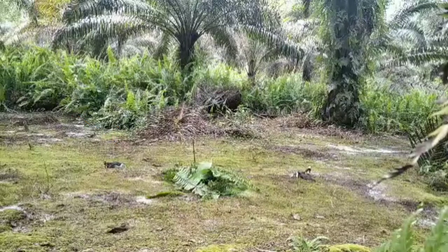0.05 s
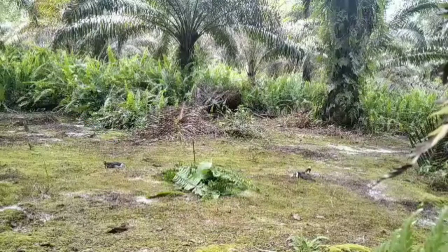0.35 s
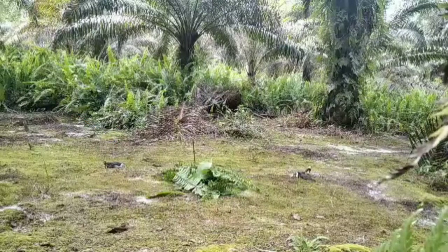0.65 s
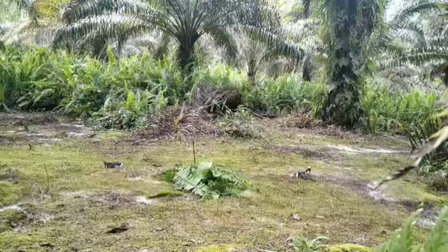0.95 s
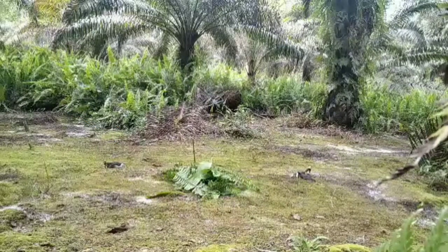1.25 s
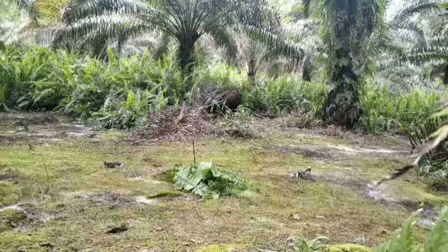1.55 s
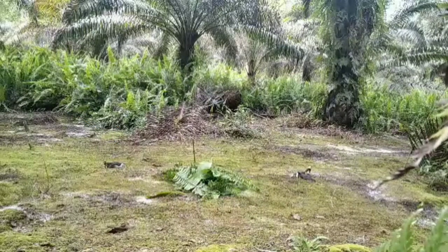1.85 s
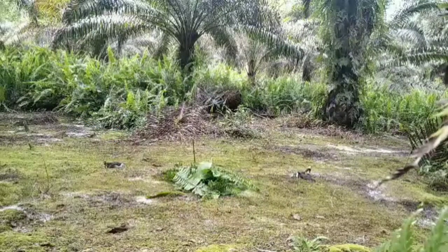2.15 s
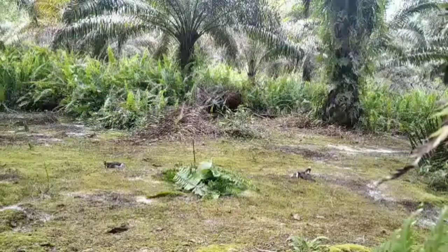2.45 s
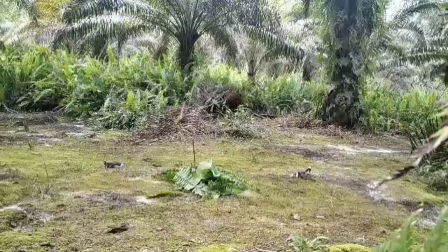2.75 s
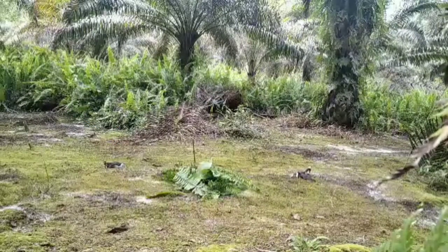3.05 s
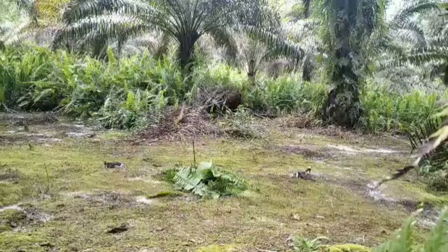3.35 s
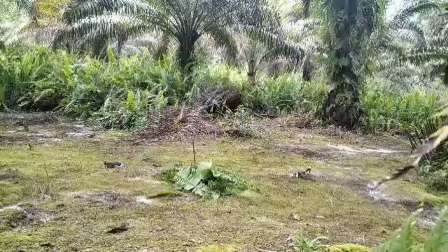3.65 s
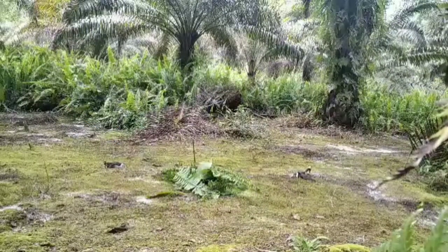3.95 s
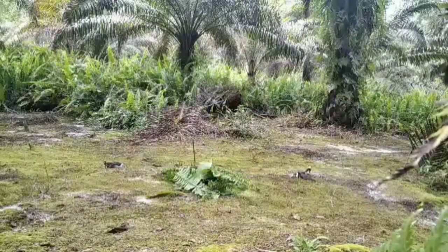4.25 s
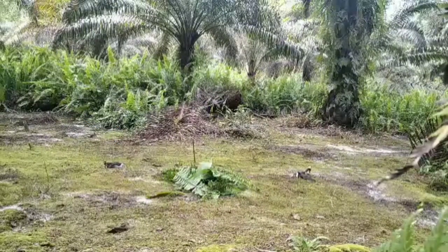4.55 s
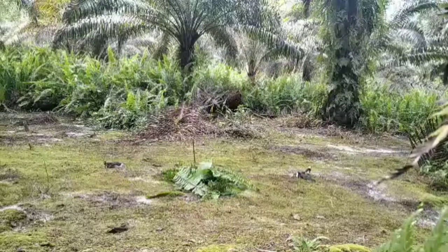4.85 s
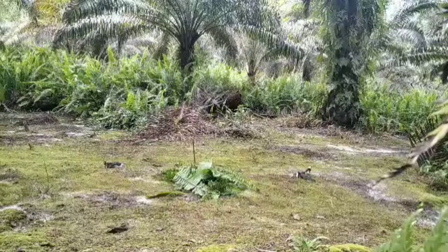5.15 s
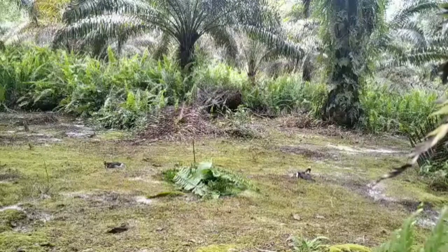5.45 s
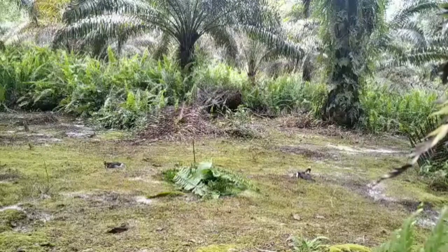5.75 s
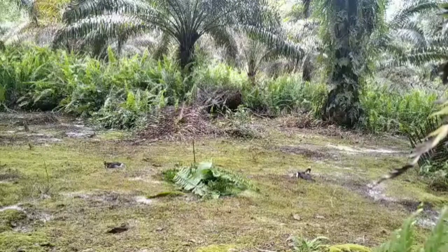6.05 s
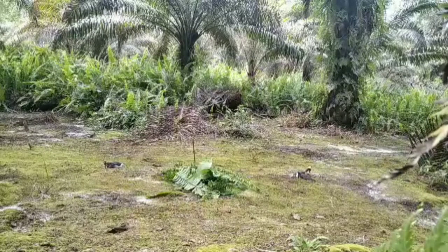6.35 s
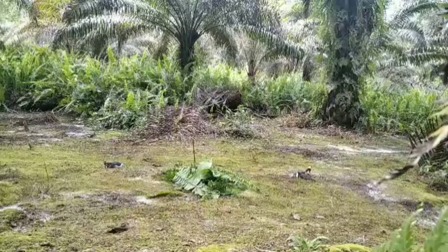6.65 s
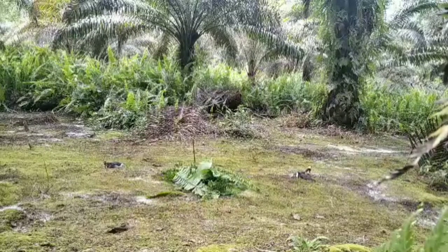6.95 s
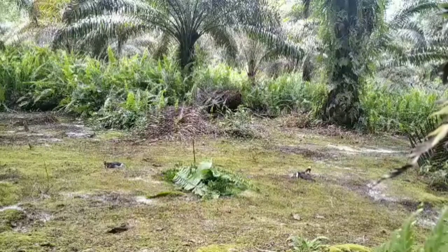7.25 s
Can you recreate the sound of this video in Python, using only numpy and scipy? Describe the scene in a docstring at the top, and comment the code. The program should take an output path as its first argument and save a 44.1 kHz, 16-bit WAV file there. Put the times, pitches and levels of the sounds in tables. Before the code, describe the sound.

From the start, a marsh bird calls loudly and clearly in a palm plantation, repeating evenly about twice a second. Each call is very short: a low, almost pure hoot that breaks upward into a higher, raspy note, followed by slight echoes off the trunks. High, shrill cicadas drone on both sides throughout, their fast throbbing gradually deepening while their level holds steady. Quiet outdoor air lies underneath, with barely audible leaf stirs around 1.5 and 3.5 seconds. From about 3.8 seconds, faint, quick rising chirps with a hissy edge fall between the calls, often in pairs, and continue to the end. Leaves give one brief swish near 4.6 seconds, then rustle softly. The bird's last two calls, at about 6.6 and 7.1 seconds, are softer and duller, and the cicadas carry on until around 7.5 seconds.

```python
"""A palm plantation, where a waterhen repeats its two-part call twice a second: a low hoot that
breaks into a higher, raspy note. Trunks throw it back as echoes and fronds scatter it into a short tail.
Cicadas drone all around, two near ones throbbing more and more, over quiet air and stirring leaves.
Halfway through, faint rising chirps with a hissy edge join in between the calls."""
import sys
import numpy as np
from scipy import signal
from scipy.fft import rfft, irfft, next_fast_len
from scipy.io import wavfile
from scipy.ndimage import uniform_filter1d, map_coordinates

SR = 44100
rng = np.random.default_rng(int(sys.argv[2]) if len(sys.argv) > 2 else 0)


def generate_wav(signal):
    """Clip the signal to [-1, 1] and save it as 16-bit WAV at the path in sys.argv[1]."""
    frames = np.transpose(np.atleast_2d(signal))
    scaled = np.clip(frames, -1, 1) * 32767
    pcm = np.round(scaled).astype(np.int16)
    wavfile.write(sys.argv[1], SR, pcm)


N = 331191
TIME = np.arange(N) / SR


def amp(db):
    """Decibels to gain."""
    return 10 ** (np.asarray(db) / 20)


def unit(x):
    """Normalise to rms 1."""
    return x / np.sqrt(np.mean(x ** 2) + 1e-20)


def along(points, hz):
    """Read a breakpoint curve on a log frequency axis."""
    freqs, values = np.transpose(points)
    return np.interp(np.log(hz + 1), np.log(freqs), values)


def wobble(rate, size=N):
    """A smooth random modulator with rate knots a second."""
    knots = rng.standard_normal(int(size * rate / SR) + 4)
    return map_coordinates(knots, [np.arange(size) * rate / SR])


def filtered(x, response):
    """EQ x with a gain given as a function of frequency."""
    size = next_fast_len(N + SR // 2)
    return irfft(rfft(x, size) * response(np.fft.rfftfreq(size, 1 / SR)), size)[..., :N]


def noise(spectrum):
    """Wide stereo noise of rms 1, shaped to a spectrum."""
    inside = lambda hz: (hz > spectrum[0][0]) & (hz < spectrum[-1][0])
    return unit(filtered(rng.standard_normal((2, N)), lambda hz: amp(along(spectrum, hz)) * inside(hz)))


def pan(side_db):
    """Left and right gains; positive leans left."""
    return amp(np.array([[.5], [-.5]]) * side_db)


def add(track, s, sound):
    """Mix a sound into a track at time s."""
    part = track[..., max(round(s * SR), 0):][..., :sound.shape[-1]]
    part += sound[..., :part.shape[-1]]


def bump(t, centre, width):
    """A bell-shaped swell and fade."""
    return np.exp(-((t - centre) / width) ** 2)


def ramp(t, start, length):
    """A straight rise from 0 to 1."""
    return np.clip((t - start) / length, 0, 1)


def envelope(t, attack, hold, release):
    """A rounded attack, a hold and a rounded release."""
    return np.sin(np.pi / 2 * ramp(t, 0, attack)) * np.cos(np.pi / 2 * ramp(t, attack + hold, release))


# tone of the air bed: (frequency [Hz], relative level [dB])
AIR_SPECTRUM = [(20, -21), (45, -11), (68, -.5), (120, -1), (350, -2), (800, -2), (1300, -5), (2100, -7.5),
                (3600, -9.5), (4700, -13), (6000, -30)]
# its stereo lean: (frequency [Hz], left minus right [dB])
AIR_PAN = [(35, 0), (70, 7), (220, 7), (400, 4), (600, 0)]


def air(level_db=-47.2, drift_db=.7):
    """A bed of quiet outdoor air, with more rumble on the left."""
    hush = filtered(noise(AIR_SPECTRUM), lambda hz: pan(along(AIR_PAN, hz)))
    return amp(level_db + drift_db * wobble(6)) * hush


def foliage_comb(hz, depth_db=2.5, step_hz=28):
    """Many paths through the foliage comb a steady sound, differently in each ear."""
    knots = rng.standard_normal((2, int(hz[-1] / step_hz) + 4))
    ripple = np.array([map_coordinates(row, [hz / step_hz]) for row in knots])
    return unit(amp(depth_db * ripple))


# pulses in one cicada throb: (position [cycles], strength [relative gain])
THROB_PULSES = [(0.198, 0.71), (.46, 0.43), (0.722, 0.14), (0.951, 0.86)]


def throb(rate_hz, drift=.005):
    """One cicada's envelope: four short pulses in every cycle."""
    cycle = np.cumsum(rate_hz * (1 + drift * wobble(1))) / SR + rng.random()
    return unit(sum(size * bump((cycle - at + .5) % 1, .5, .085) for at, size in THROB_PULSES))


# body of the cicada drone: (frequency [Hz], relative level [dB])
DRONE_SPECTRUM = [(3000, -77), (5100, -35), (5520, -20.5), (6300, -28.5), (6790, -6), (7490, 4.5),
                  (7810, 0.5), (8420, -10), (9650, -18.5), (11200, -32), (12600, -35), (13000, -46)]
# its stereo spread: (frequency [Hz], left minus right [dB])
DRONE_PAN = [(6500, -1), (7000, 2.5), (7600, -2.5), (8500, 1), (9500, 5), (10600, -3.5), (12000, 5.5)]
# the shrill sheen about an octave up: (frequency [Hz], relative level [dB])
SHRILL_SPECTRUM = [(12800, -50), (13100, -22), (13500, -10), (13800, -2), (14100, -1), (14220, 1),
                   (14330, -26), (15400, -33), (15700, -60)]


def cicadas(level_db=-17.5, shrill_db=-21, near_start_db=-10.5, near_growth_db_per_s=.85):
    """Far cicadas blur into a drone; two near ones throb ever deeper, at slightly different rates."""
    throbs = np.hypot(pan(3) * throb(rate_hz=24.4), pan(-4) * throb(rate_hz=23.9))
    near = amp(near_start_db + near_growth_db_per_s * TIME) * throbs
    mean_power = 1 + uniform_filter1d(near ** 2, size=SR // 2)
    tremolo = np.sqrt((1 + near ** 2) / mean_power)  # deepens while the average level holds
    drone = filtered(noise(DRONE_SPECTRUM), lambda hz: pan(along(DRONE_PAN, hz)))
    sheen = amp(shrill_db) * pan(2.5) * noise(SHRILL_SPECTRUM)
    return amp(level_db) * tremolo * filtered(drone + sheen, foliage_comb)


# tone of the rustle, also the chirps' hiss: (frequency [Hz], relative level [dB])
RUSTLE_SPECTRUM = [(300, -24), (900, -16), (1850, -9), (2300, -8.5), (2800, -1), (3100, -3), (3550, 3),
                   (4200, 0), (4600, -1), (4850, -10), (7000, -16), (12000, -40)]
# soft stirs in the leaves: (peak time [s], level [dB], rise [s], fall [s])
LEAF_STIRS = [(1.45, -48.5, 0.17, .2), (3.45, -46.5, 0.11, .25), (4.61, -40, 0.056, 0.19),
              (5.7, -46, 0.87, 1)]
# a sharp swish: (time [s], level [dB], half length [s])
LEAF_SWISHES = [(4.574, -25, 0.016)]


def leaves(flutter_db=2.5, grain_db=3):
    """A light, uneven, grainy rustle: a few stirs and one sharp swish."""
    flutter = amp(flutter_db * wobble(45))
    grain = unit(amp(grain_db * wobble(500)))
    stir = sum(amp(db) * np.exp(-np.maximum((s - TIME) / rise, (TIME - s) / fall))
               for s, db, rise, fall in LEAF_STIRS)
    swish = sum(amp(db) * bump(TIME, s, width) for s, db, width in LEAF_SWISHES)
    return (stir * flutter + swish) * grain * noise(RUSTLE_SPECTRUM)


# reverb time of the grove: (frequency [Hz], time to fall 60 dB [s])
GROVE_T60 = [(500, 0.23), (850, 0.34), (1200, 0.38), (2600, 0.26), (3600, 0.43), (8000, 0.14)]


def grove(x, build_s=.012):
    """Fronds scatter a sound into a diffuse tail, different in each ear."""
    hz, t, bands = signal.stft(rng.standard_normal((2, SR // 2)), SR, nperseg=256)
    decay = amp(-60 * t / along(GROVE_T60, hz)[:, None])
    fade_in = 1 - np.exp(-t / build_s)
    _, tail = signal.istft(bands * decay * fade_in, SR, nperseg=256)
    return signal.fftconvolve(np.atleast_2d(x), tail / np.linalg.norm(tail[0]), axes=1)[:, :N]


# slapback taps off the trunks: (delay [s], left gain [dB], right gain [dB])
TRUNK_ECHOES = [(.031, -29.5, -27.5), (.062, -28, -22.5), (.145, -35, -40)]


def trunks(x):
    """Single trunks throw back a few distinct echoes."""
    return filtered(x, lambda hz: sum(amp([[left], [right]]) * np.exp(-2j * np.pi * hz * s)
                                      for s, left, right in TRUNK_ECHOES))


# cues for the faint chirps: (time [s], tone level [dB], level of the chirp's puff of hiss [dB])
CHIRP_CUES = [(3.766, -37, -66), (3.837, -32.5, -36), (4.202, -34, -39), (4.348, -35, -36),
              (4.442, -34, -30), (4.692, -34, -29), (4.767, -32.5, -30.5), (4.907, -35, -36.5),
              (4.981, -37, -36), (5.159, -35, -54), (5.239, -35, -35.5), (5.393, -36, -42),
              (5.466, -33.5, -35), (5.781, -36.5, -60), (5.855, -37, -34.5), (6.022, -36, -41.5),
              (6.279, -35.5, -36.5), (6.361, -34.5, -33), (6.522, -39, -61), (6.767, -42.5, -42),
              (6.833, -36, -41), (6.894, -36, -35), (7.368, -40.5, -47), (7.448, -42.5, -53)]


def chirps(centre_hz=795, spread_hz=35, sweep_hz_per_s=17000):
    """Quick, rough upward sweeps of varying length, each with a puff of hiss."""
    tone, puffs = np.zeros((2, N))
    t = np.arange(-SR // 20, SR // 20) / SR
    variations = rng.standard_normal((len(CHIRP_CUES), 3))
    for (s, tone_db, hiss_db), (speed, length, pitch) in zip(CHIRP_CUES, variations):
        hz = centre_hz + spread_hz * pitch + (sweep_hz_per_s + 3000 * speed) * t
        phase = 2 * np.pi * np.cumsum(hz) / SR + .4 * wobble(400, len(t))
        rough = amp(2 * wobble(400, len(t)))
        add(tone, s + t[0], amp(tone_db) * rough * bump(t, 0, .0105 + .001 * length) * np.sin(phase))
        add(puffs, s + t[0], .7 * amp(hiss_db) * bump(t, .009, .016))
    return tone + puffs * noise(RUSTLE_SPECTRUM)


def voiced(hz, level, jitter=.0095, shimmer_db=.49):
    """Phase and envelope of one slightly unsteady note."""
    cycles = np.cumsum(hz * (1 + jitter * wobble(250, len(hz)))) / SR + rng.random()
    return 2 * np.pi * cycles, level * amp(shimmer_db * wobble(90, len(hz)))


def hoot(t, tuning, pitch_hz=848, swing_hz=65, lift_hz=46.64, swell_db_per_s=18, second_db=-47):
    """An almost pure tone: its pitch swings, settles, then lifts just before the break."""
    swing = np.sin(2 * np.pi * t / .0091) * np.exp(-np.abs(t) / .0066)
    lift = ramp(t, start=.031, length=.0031)
    hz = pitch_hz + swing_hz * swing + lift_hz * lift
    swell = amp(swell_db_per_s * t - .5 * lift)  # weakens a touch on the lift
    phase, level = voiced(tuning * hz, swell * envelope(t, attack=.009, hold=.031, release=.0062))
    return level * (np.sin(phase) + amp(second_db) * np.sin(2 * phase))


def high_note(t, tuning, break_s=.045, from_hz=985, to_hz=1211, glide_s=.01835, overshoot_hz=48.5,
              rasp_db=-26.5, flare_db=15, rough_rad=.88):
    """The voice breaks upward, overshoots and settles; its raspy overtones flare in mid-glide."""
    age = t - break_s
    glide = from_hz + (to_hz - from_hz) * ramp(age, 0, glide_s)
    overshoot = overshoot_hz * np.exp(-np.abs(age - glide_s) / .0054)
    shape = envelope(age, attack=.01, hold=.023, release=.018)
    phase, level = voiced(tuning * (glide + overshoot), shape, jitter=.011, shimmer_db=1)
    raspy = lambda ratio: np.sin(ratio * phase + rough_rad * wobble(350, len(t)))
    # in the break every other cycle differs, which adds half-pitch partials
    halves = bump(t, .051, .008) * (amp(-15) * np.sin(phase / 2) + amp(-21) * raspy(3 / 2))
    creak = bump(t, .059, .0045) * raspy(5 / 2) + .22 * bump(t, .069, .009) * raspy(9 / 4)
    brightness = amp(rasp_db + flare_db * bump(age, .012, .0031))
    overtones = level * brightness * (amp(-9) * raspy(2) + raspy(3))
    return level * np.sin(phase) + halves, overtones + amp(-16) * creak


# resonances of the bird's throat: (centre [Hz], width [Hz], gain [dB])
THROAT_FORMANTS = [(2475, 125, 7), (2750, 140, 4), (3457, 133, -2.5), (3736, 180, 2.5)]


def throat(x):
    """Narrow resonances, with dark valleys between them, colour the overtones."""
    return filtered(x, lambda hz: sum(amp(db) / np.sqrt(1 + ((hz - centre) / (width / 2)) ** 4)
                                      for centre, width, db in THROAT_FORMANTS))


# cues for the waterhen: (time [s], effort against the usual call [dB])
CALL_CUES = [(0.0326, -0.5), (0.528, -0.44), (1.0325, -0.5), (1.538, -0.5), (2.0424, -0.5), (2.5383, -1),
             (3.043, .5), (3.5483, -0.5), (4.0522, -1.4), (4.548, -1), (5.0531, -0.5), (5.5579, -0.8),
             (6.0627, -0.5), (6.5745, -4.5), (7.0796, -4.5)]


def waterhen(hoot_db=-2, high_db=-9.5, high_effort_share=.2, brightening=.95, detune=.002):
    """Three stems (hoots, high notes, overtones) of near-identical calls; a softer call is duller."""
    stems = np.zeros((3, N))
    t = np.arange(-SR // 200, SR // 8) / SR
    tunings = 1 + detune * rng.standard_normal(len(CALL_CUES))
    for (s, effort_db), tuning in zip(CALL_CUES, tunings):
        tone, overtones = high_note(t, tuning)
        low = amp(hoot_db + effort_db) * hoot(t, tuning)
        high_gain = amp(high_db + high_effort_share * effort_db)
        rasp_gain = high_gain * amp(brightening * effort_db)
        add(stems, s + t[0], np.array([low, high_gain * tone, rasp_gain * overtones]))
    return stems


def scene(hoot_send_db=-28, high_send_db=-21, rasp_db=-1, rasp_send_db=-2, chirp_send_db=-12):
    """The call's low tones arrive mostly direct; its overtones beam into the grove and scatter back."""
    hoots, highs, overtones = waterhen()
    direct = pan(-2) * hoots + pan(2.3) * highs
    coloured = throat(overtones)
    rasp = amp(rasp_db) * (coloured + overtones) / 2 + amp(rasp_send_db) * grove(coloured)
    echoes = trunks(hoots / 3 + highs)
    tail = grove(amp(hoot_send_db) * hoots + amp(high_send_db) * highs)
    dry_chirps = chirps()
    background = dry_chirps + amp(chirp_send_db) * grove(dry_chirps) + leaves() + cicadas() + air()
    return background + direct + rasp + echoes + tail


def record(dry, top_hz=15655):
    """The master: a hard clip at full scale, then a brick-wall low-pass."""
    return filtered(np.clip(dry, -1, 1), lambda hz: hz < top_hz)


dry = scene()
out = record(dry)
generate_wav(out)
```